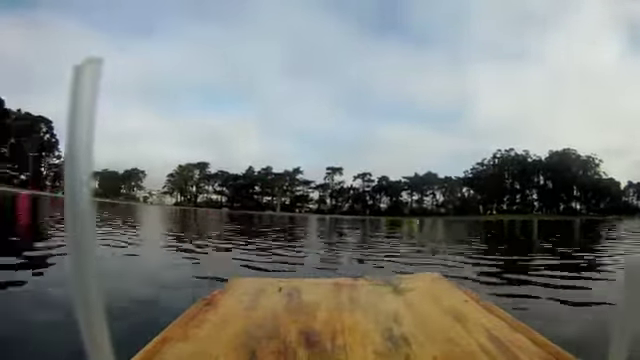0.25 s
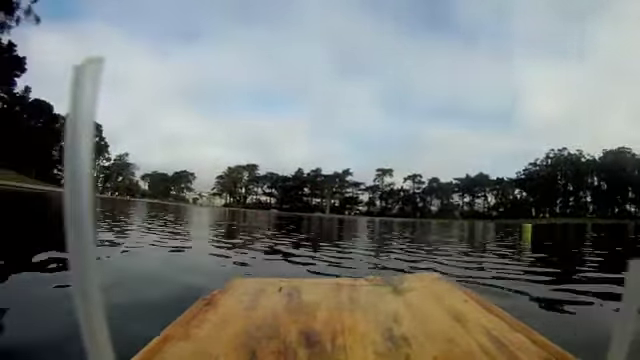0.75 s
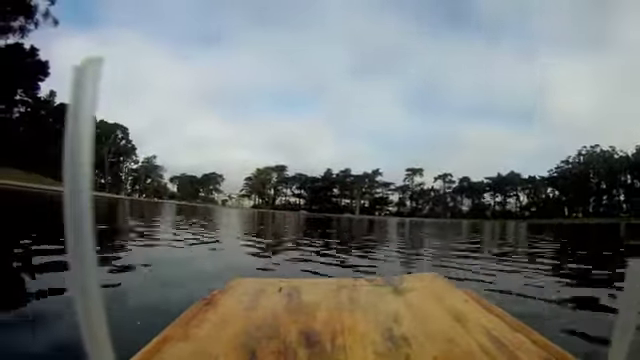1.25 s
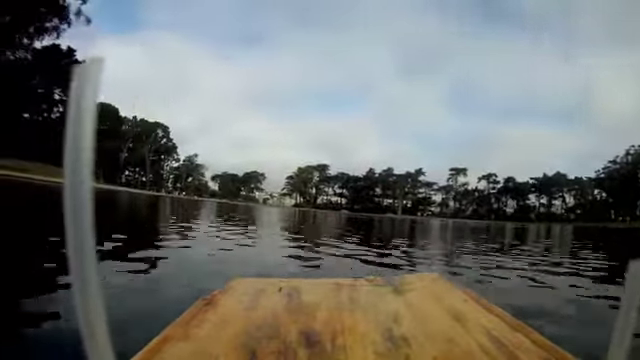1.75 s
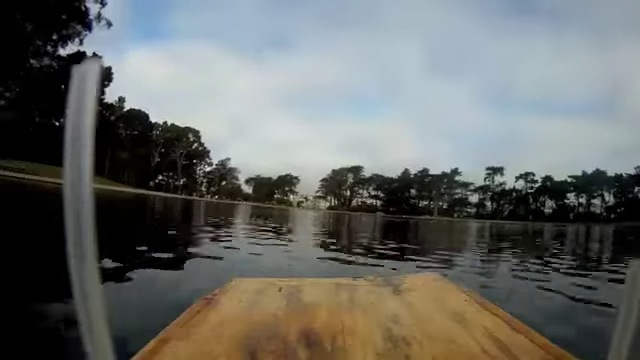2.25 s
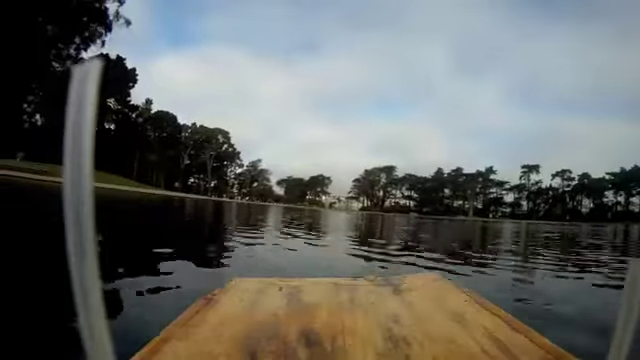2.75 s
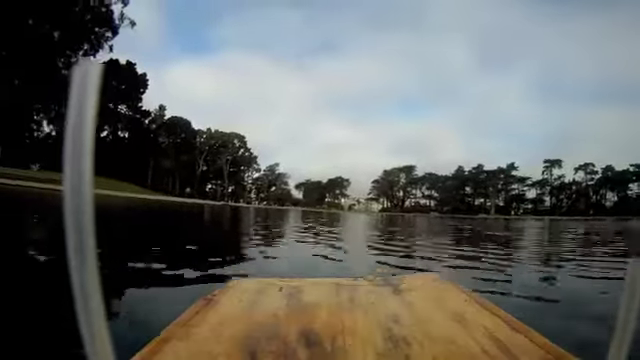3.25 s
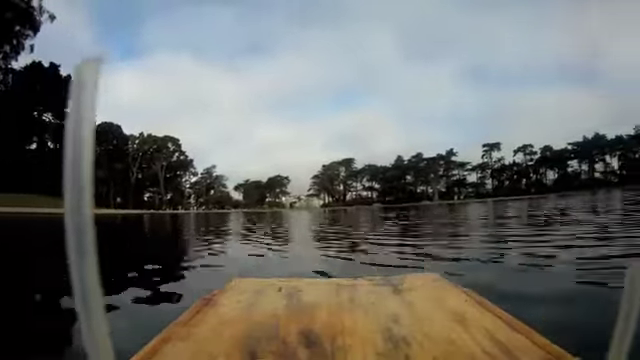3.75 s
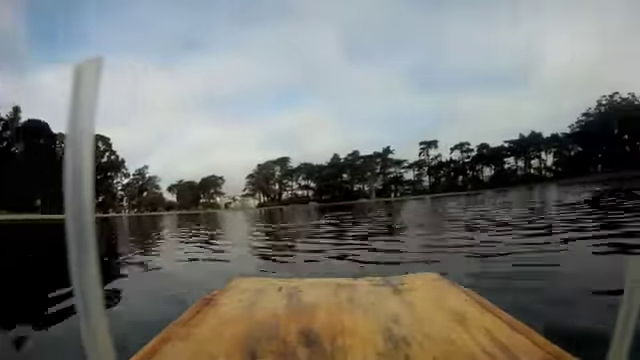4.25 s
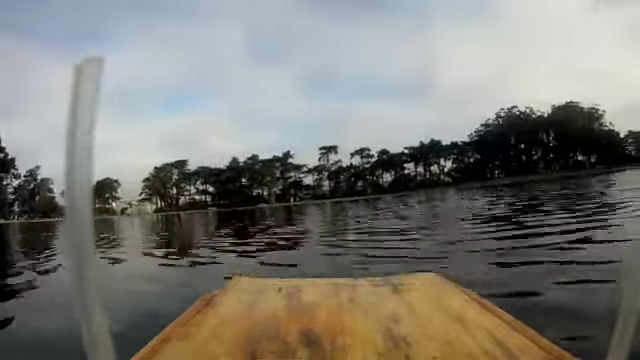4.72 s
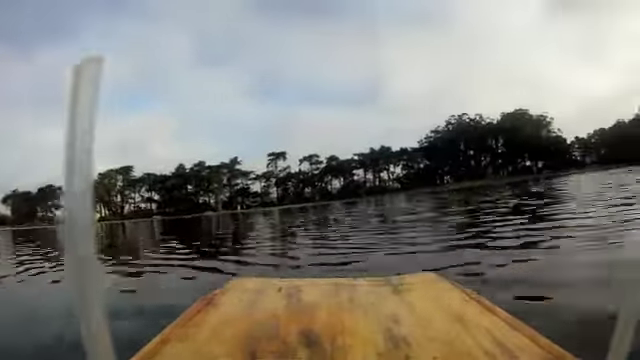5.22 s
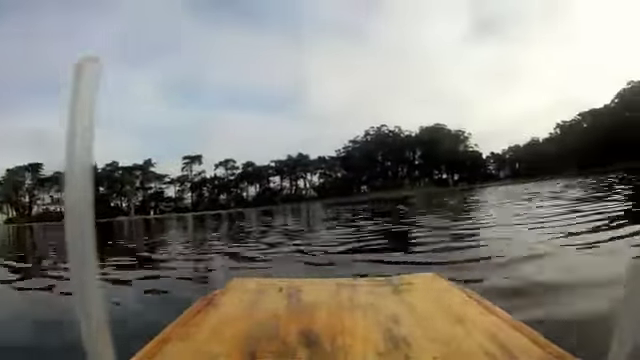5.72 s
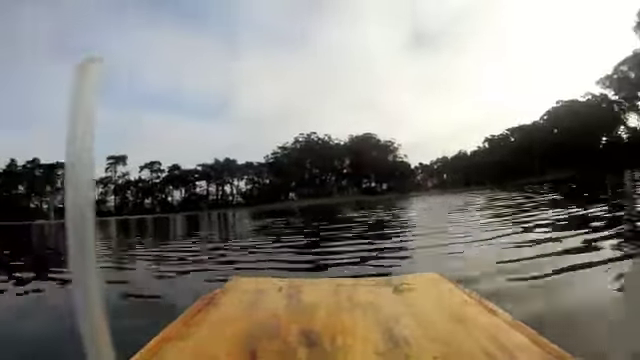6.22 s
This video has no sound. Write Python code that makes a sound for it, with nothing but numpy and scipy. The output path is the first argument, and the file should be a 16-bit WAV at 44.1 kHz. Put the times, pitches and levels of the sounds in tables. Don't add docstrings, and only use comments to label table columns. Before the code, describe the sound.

Close, boxy, gritty buzz of a small boat motor, climbing in quick steps by one and a half seconds, then holding steady.

```python
import sys
import numpy as np
from scipy import signal
from scipy.fft import rfft, irfft
from scipy.io import wavfile
from scipy.ndimage import uniform_filter1d, minimum_filter1d

SR = 44100
rng = np.random.default_rng(int(sys.argv[2]) if len(sys.argv) > 2 else 0)


def field_ratio(decibels):
    return 10 ** (np.asarray(decibels, dtype=float) / 20)


def wav_record(signal):
    frames = np.transpose(np.atleast_2d(signal))
    bounded = np.clip(frames, -1, 1)
    quanta = np.round(bounded * 32767).astype(np.int16)
    wavfile.write(sys.argv[1], SR, quanta)


N = 285768


def level(x, db):
    return x * field_ratio(db) / np.sqrt(np.mean(x ** 2))


def walk(rate):
    k = int(SR / rate)
    steps = np.repeat(rng.standard_normal(N // k + 1), k)
    wander = uniform_filter1d(uniform_filter1d(steps, k), k)[:N]
    return wander / wander.std()


def ring(x, hz, width):
    return signal.lfilter(*signal.iirpeak(hz, hz / width, SR), x)


def colour(x, table):
    hz, db = np.transpose(table)
    f = np.fft.rfftfreq(N, 1 / SR) + 1
    return irfft(rfft(x) * field_ratio(np.interp(np.log(f), np.log(hz), db)), N)


def swells(times, sizes, lengths, onset=0.94):
    t, out = np.arange(N) / SR, np.zeros(N)
    for s, size, length in np.broadcast(times, sizes, lengths):
        near = slice(max(int((s - 3 * length) * SR), 0), int((s + 3 * length) * SR))
        half = length / 2 * np.where(t[near] < s, onset, 2 - onset)
        out[near] += size * 2. ** (-((t[near] - s) / half) ** 2)
    return out


# time in seconds, shaft turns per second (Hz),
# balls passing the inner race per turn.
SHAFT = [(0, 207.8, 3.802), (.2, 208.6, 3.802), (.86, 208.2, 3.802), (.93, 218, 3.803), (1.0, 221, 3.804),
         (1.07, 228.5, 3.805), (1.32, 231.5, 3.808), (1.37, 248.5, 3.82), (1.46, 251, 3.826),
         (1.53, 258.6, 3.83), (2.0, 258.7, 3.818), (2.9, 258.3, 3.822), (3.1, 257.2, 3.823),
         (4.2, 256.8, 3.824), (4.6, 256.2, 3.832), (6.48, 256, 3.833)]


def throttle():
    s, hz, balls = np.transpose(SHAFT)
    t = np.arange(N) / SR
    shaft_hz = np.interp(t, s, hz)
    inner_hz = np.interp(t, s, balls) * shaft_hz
    slow_hz, fast_hz = 219, 254
    fast = np.clip((shaft_hz - slow_hz) / (fast_hz - slow_hz), 0, 1)
    return shaft_hz, inner_hz, fast


# frequency in Hz, gain in dB.
HULL_PATH = [(790, -3.5), (812, -7), (845, -24), (888, -1), (960, 2), (1030, 4), (1090, 6), (1122, -1)]


def path_db(hz):
    path_hz, db = np.transpose(HULL_PATH)
    return np.interp(np.log(hz), np.log(path_hz), db)


BAND_TOP_HZ = 2559


def above_band_db(hz):
    return -13.5 / (1 + np.exp((BAND_TOP_HZ - hz) / 15))


# multiple of the shaft rate, multiple of the inner race rate,
# level in dB at low throttle, level in dB at high throttle. The outer race rate is 6 shaft - inner.
TONES = [(1, 0, -48, -50.5), (2, 0, -50, -53.5), (5, 0, -70, -54), (6, 0, -35, -36.5), (8, 0, -39, -25),
         (10, 0, -25.5, -34.5), (6, -1, -60, -56.5), (18, -3, -29.5, -39.5), (6, 1, -31, -51),
         (24, -4, -42, -69.5), (30, -5, -58, -35), (-1, 1, -80, -43), (1, 1, -33.5, -38.5),
         (2, 1, -28.5, -44), (10, -1, -28.5, -58), (12, -1, -50, -27.5), (0, 2, -38.5, -50.5),
         (0, 3, -27.5, -51)]
# multiple of the shaft rate, level in dB.
WHINE = [(12, -36), (14, -38.5), (16, -47), (18, -53), (20, -50.5), (22, -54.5), (24, -54), (26, -74),
         (28, -72)]


def tones(shaft_hz, inner_hz, fast):
    creep_s = np.maximum(np.arange(N) / SR - 3.8, 0)
    inner_db = -28 + path_db(inner_hz) + 2.1 * creep_s
    outer_db = -32 + path_db(2 * (6 * shaft_hz - inner_hz)) - 6 * creep_s
    fourth_db = -37 + path_db(4 * shaft_hz)
    sideband_creep_db = 3 * creep_s

    shaft = 2 * np.pi * np.cumsum(shaft_hz + .5 * walk(8)) / SR
    inner = 2 * np.pi * np.cumsum(inner_hz) / SR
    slip = np.cumsum(walk(60)) / SR * 2 * np.pi * 2.425 + 0.55 * walk(150)
    ball = inner + slip * (.15 + .85 * fast)

    out = field_ratio(inner_db + 1.2 * fast * walk(40)) * np.sin(ball)
    out = out + field_ratio(outer_db + 1.5 * walk(25)) * np.sin(2 * (6 * shaft - ball))
    out = out + field_ratio(fourth_db + 1.5 * walk(25)) * np.sin(4 * shaft)
    for m, n, slow_db, fast_db in TONES:
        m, n = int(m), int(n)
        db = slow_db + (fast_db - slow_db) * fast
        db = db + min(0.49 + 0.52 * m, 2.5) * walk(20)
        db = db + above_band_db(m * shaft_hz + n * inner_hz) + (n == 1) * sideband_creep_db
        out = out + field_ratio(db) * np.sin(m * shaft + n * ball + rng.uniform(0, 2 * np.pi))
    for m, db in WHINE:
        m = int(m)
        ragged = 1.03 + walk(180) + 1j * walk(180)
        strength = field_ratio(db + above_band_db(m * shaft_hz)) * (m * shaft_hz < 5900)
        out = out + strength * np.imag(ragged * np.exp(1j * m * shaft))
    return np.sqrt(2) * out


# frequency in Hz, width in Hz, level in dB at low throttle,
# level in dB at high throttle.
BODY = [(746, 70, -16.5, -18.5), (954, 21, -35, -16.5), (1209, 96, -7.5, -9.5), (1155, 94, -36, -13),
        (1388, 175, -10.5, -13.5), (1502, 47, -27, -22), (1991.5, 71, 3, 4), (2400, 54, -15.5, -13.5),
        (1876, 52, -4, -11.5)]
# frequency in Hz, level in dB per Hz.
FINE_RATTLE = [(1560, -27), (2650, -7.5), (2700, -11), (3040, -13), (3300, -13.5), (3640, -11.5), (4330, -22.5),
               (5210, -26.5), (5850, -35.5), (5950, -32), (7740, -71), (13100, -120)]


def rattle(shaft_hz, db, fast):
    turn = 2 * np.pi * np.cumsum(shaft_hz) / SR
    strength = (1 + 0.27 * np.sin(turn) + 0.15 * np.sin(2 * turn)) * field_ratio(0.2 * walk(35))
    knocks = strength * rng.standard_normal(N)
    body = np.zeros(N)
    for hz, width, slow_db, fast_db in BODY:
        body = body + field_ratio(slow_db + (fast_db - slow_db) * fast) * ring(knocks, hz, width)
    body = signal.sosfilt(signal.ellip(5, .5, 35, 694.5, "high", fs=SR, output="sos"), body)
    inside = signal.sosfilt(signal.ellip(8, .5, 40, BAND_TOP_HZ, fs=SR, output="sos"), body)
    fine_rattle = colour(strength * field_ratio(1.7 * walk(30)) * rng.standard_normal(N), FINE_RATTLE)
    return level(inside, 0.59) * field_ratio(db) + level(fine_rattle, -41) * field_ratio(1.5 * (2.0 - fast))


# time in seconds, hum level in dB, length in seconds.
WAVES = [(.03, -36, 0.34), (.62, -47, 0.18), (.86, -42, 0.11), (1.25, -43, .2), (2.03, -48, 0.22),
         (2.38, -48, 0.14), (3.19, -56, 0.28), (3.9, -49, 0.26), (4.22, -51, 0.11), (4.6, -46, 0.15),
         (4.82, -46, 0.2), (5.17, -54, 0.13), (5.52, -50, .3), (5.87, -50, .15), (6.15, -40, .3),
         (6.48, -41, 0.16)]
# time in seconds, level in dB.
SLAPS = [(.53, -57), (.79, -54), (1.24, -60), (2.59, -54), (3.6, -56), (3.85, -52), (3.99, -55),
         (4.85, -57), (5.31, -59), (5.53, -53), (5.67, -59), (5.82, -52), (5.92, -53), (6.17, -55),
         (6.33, -48)]
# frequency in Hz, level in dB per Hz.
FLOOR = [(26, -35.5), (45, -3.5), (182, -19.5), (252, -15), (278, -18), (317, -13.5), (453, -9), (516, -8),
         (600, -5), (780, -46), (1320, -120)]


def hull():
    wave_s, wave_db, wave_length = np.transpose(WAVES)
    slap_s, slap_db = np.transpose(SLAPS)
    rocking = field_ratio(-56) + swells(wave_s, field_ratio(wave_db), wave_length)
    slapping = field_ratio(-67.5) + swells(slap_s, field_ratio(slap_db), 0.088)
    rock = np.cumsum(29 + 2.2 * walk(8.8)) / SR
    hum = np.sqrt(2) * rocking * field_ratio(1.5 * walk(8.5)) * np.sin(2 * np.pi * rock)
    slap = ring(ring(rng.standard_normal(N), 103, 25), 103, 25)
    murmur = colour(rng.standard_normal(N), FLOOR) * field_ratio(np.linspace(-1.5, 1.5, N))
    return hum + level(slap, -0.92) * slapping + level(murmur, -52)


# time in seconds, rattle change in dB, length in seconds.
LAPSES = [(0.213, -10, 0.012), (0.276, -3, 0.04), (0.608, -3.5, 0.045), (0.957, -6.5, 0.042),
          (1.101, -5, 0.022), (1.155, -5.5, 0.037), (1.526, -11, 0.012), (1.603, -2.5, 0.05),
          (1.918, -2.5, 0.057), (2.026, -3, 0.027), (2.097, -3, 0.035), (2.28, -6.7, 0.036),
          (2.333, -4.5, 0.032), (2.496, -5, 0.029), (2.754, -3, 0.11), (2.879, -4.5, 0.035),
          (2.98, -2, 0.079), (3.22, -2.5, 0.037), (3.469, -5.5, 0.037), (3.585, -1.5, 0.058),
          (3.763, -3.5, 0.05), (3.894, -2, 0.025), (4.252, -2, 0.031), (4.527, -4, 0.043),
          (4.816, -4, 0.048), (4.98, -2, 0.024), (5.12, -3.5, 0.031), (5.823, -1.5, 0.025),
          (5.97, -3.5, 0.019), (6.02, -5, 0.02)]


def lapses():
    return swells(*np.transpose(LAPSES), onset=0.95)


# time in seconds, peak in dB, frequency in Hz.
FLARES = [(.2505, 4, 2040), (.8645, 6, 2010), (1.317, 3.5, 2010), (3.447, 6, 2010), (4.4525, 1, 2010),
          (4.493, 7, 2000), (4.766, 5, 1980), (5.54, 0, 1880), (0.9313, 4, 2040), (1.071, 4.5, 2050),
          (1.1144, 2.5, 2050), (1.4451, 7, 2016), (1.5439, 2, 2040), (1.6826, 1, 2045), (1.8711, 5, 1990),
          (2.0577, 4, 1930), (2.165, 7, 1910), (2.4728, 5, 2050), (2.6374, 3, 1994), (2.6863, 6, 1957),
          (2.8938, 3.5, 1990), (3.2665, 2, 1970), (3.4735, 0.5, 1940), (4.2837, 2, 1990), (4.4278, 4, 2080),
          (4.7247, 4, 1990), (4.8554, -2, 2050), (5.0968, 0.5, 1950), (5.1567, 1, 1974),
          (5.9359, 3.5, 2030)]


def flares():
    t, out = np.arange(int(.03 * SR)) / SR, np.zeros(N + SR)
    swell = (1 - np.exp(-t / 0.0031)) * np.exp(-(t / 0.0061) ** 1.4)
    for s, db, hz in FLARES:
        start = int(s * SR)
        out[start:start + len(t)] += field_ratio(db - 2.0) * swell * np.sin(2 * np.pi * hz * t)
    return out[:N]


def scene():
    shaft_hz, inner_hz, fast = throttle()
    lapse_db = lapses()
    yield_db = swells(np.transpose(FLARES)[0], -3.5, 0.014)
    motor = tones(shaft_hz, inner_hz, fast) * field_ratio(0.5 * lapse_db)
    motor = motor + rattle(shaft_hz, -14 + lapse_db + yield_db, fast)
    return (motor * field_ratio(0.75 * walk(45)) + hull() + flares())[None]


def gain_control(x, top, follow_hz, squeeze):
    power = signal.sosfilt(signal.butter(2, follow_hz, fs=SR, output="sos"), x ** 2)
    x = x * (1 + np.maximum(power, 0) / top ** 2) ** -squeeze
    room = minimum_filter1d(np.minimum(1, .8 / (abs(x) + 1e-9)), size=257)
    return x * uniform_filter1d(uniform_filter1d(room, size=128), size=128)


def sample_and_hold(x):
    slow = signal.resample_poly(x, 40, 147, axis=1)
    return signal.resample_poly(np.repeat(slow, 4, axis=1), 147, 160, axis=1)[:, :N]


def low_pass(x):
    return signal.sosfilt(signal.butter(12, 15730, fs=SR, output="sos"), x)


def record(dry):
    squared = signal.sosfilt(signal.butter(2, 1500, "high", fs=SR, output="sos"), dry ** 2)
    bent = gain_control(dry + 0.051 * squared, 0.57, 54, 0.081) * field_ratio(-0.49)
    dull = signal.sosfilt(signal.ellip(4, .5, 25, 5800, fs=SR, output="sos"), bent)
    held = sample_and_hold(dull)
    held = signal.sosfilt(signal.ellip(4, .3, 50, [11370, 12600], "bandstop", fs=SR, output="sos"), held)
    held = signal.sosfilt(signal.ellip(8, .3, 40, 15150, fs=SR, output="sos"), held)
    return low_pass(held)


dry = scene()
out = record(dry)
wav_record(out)
```